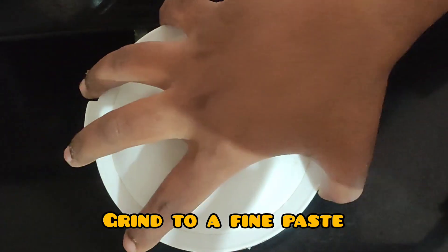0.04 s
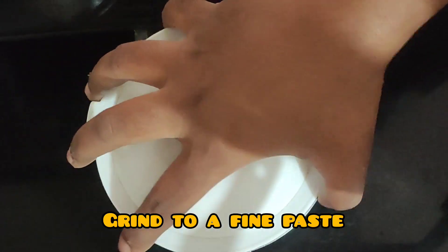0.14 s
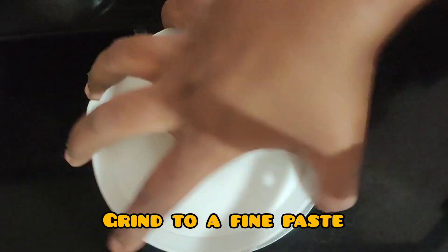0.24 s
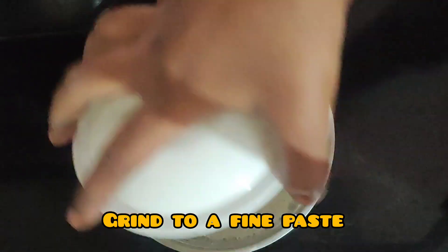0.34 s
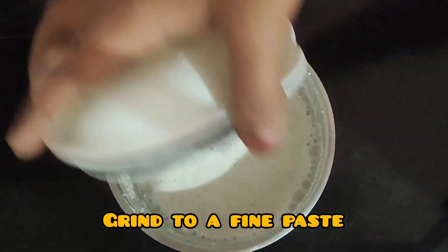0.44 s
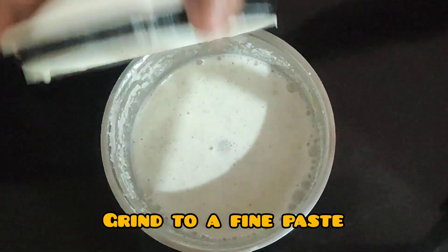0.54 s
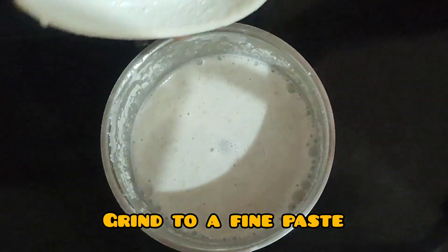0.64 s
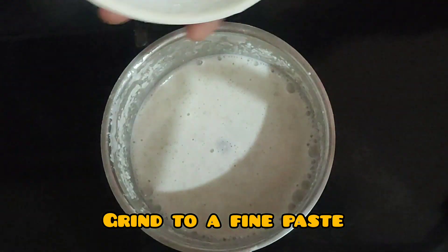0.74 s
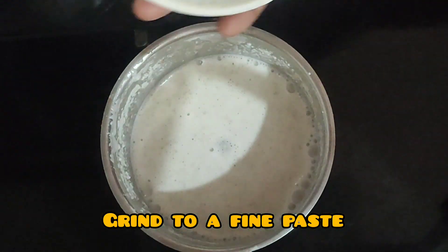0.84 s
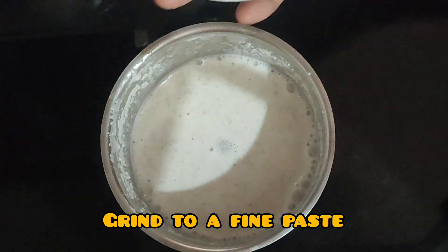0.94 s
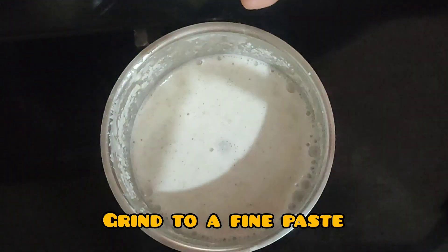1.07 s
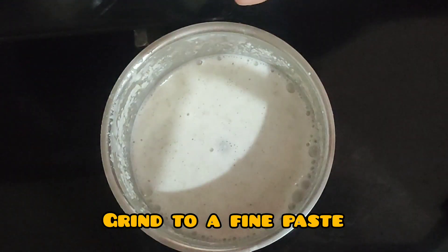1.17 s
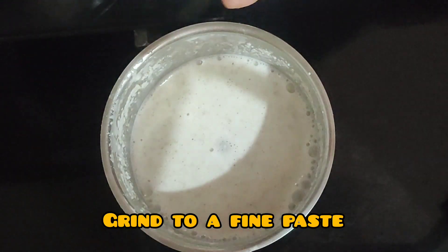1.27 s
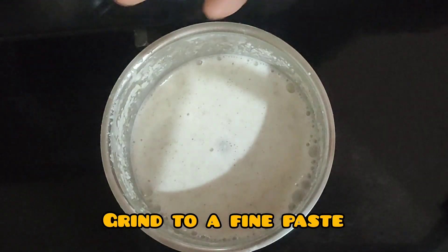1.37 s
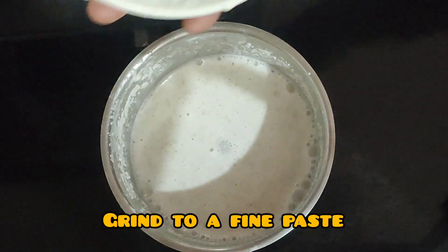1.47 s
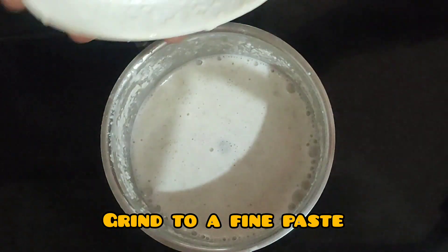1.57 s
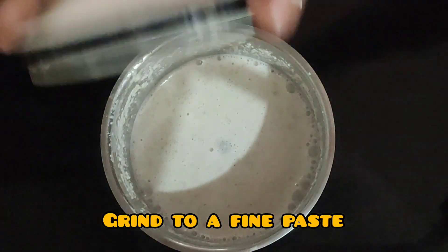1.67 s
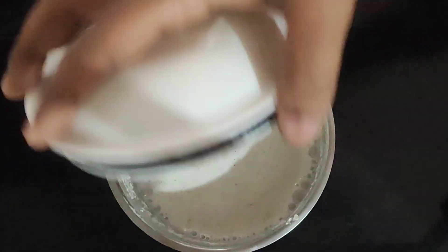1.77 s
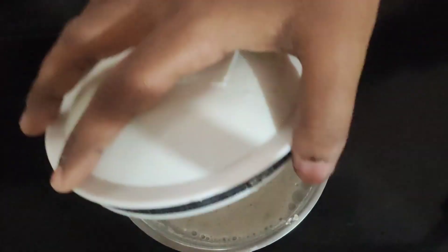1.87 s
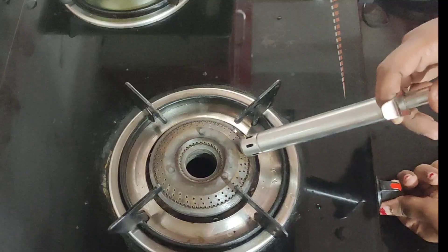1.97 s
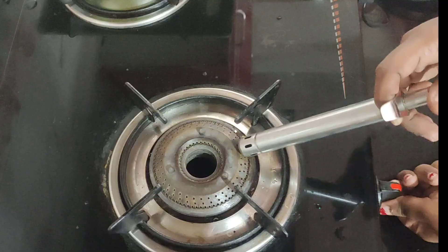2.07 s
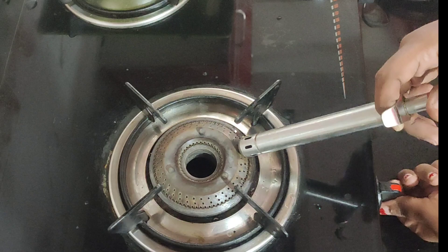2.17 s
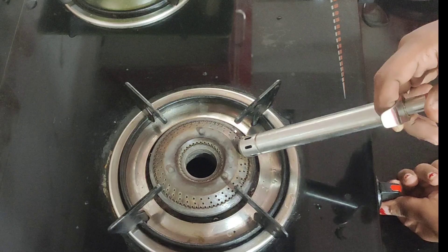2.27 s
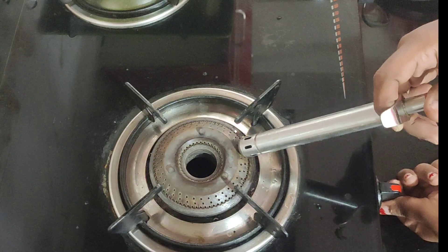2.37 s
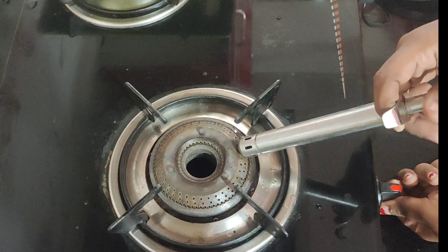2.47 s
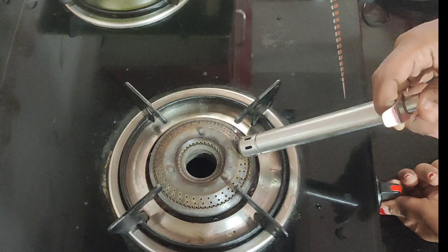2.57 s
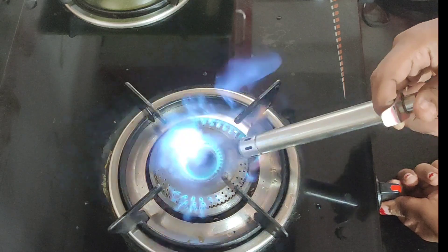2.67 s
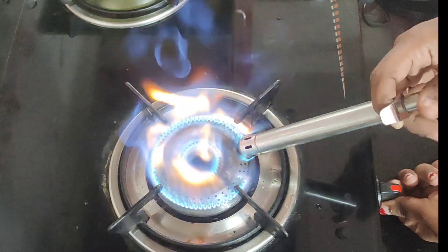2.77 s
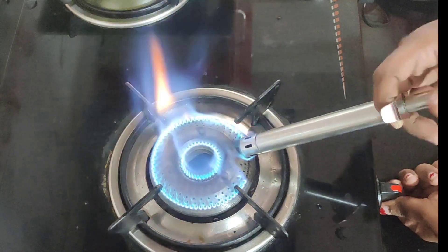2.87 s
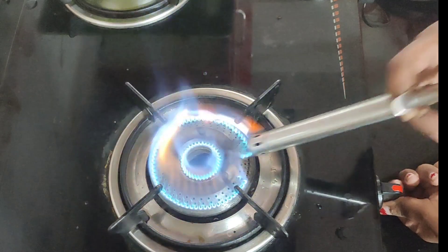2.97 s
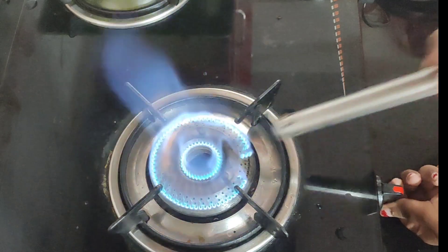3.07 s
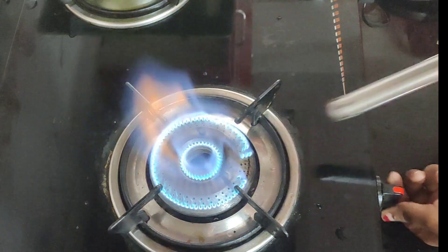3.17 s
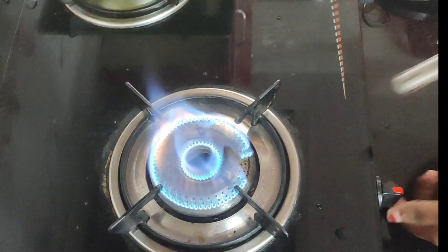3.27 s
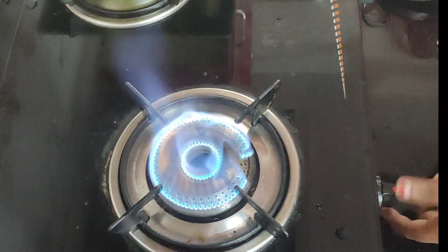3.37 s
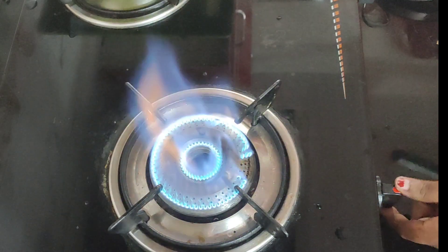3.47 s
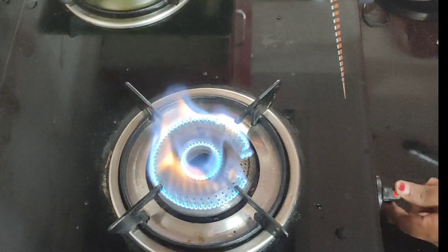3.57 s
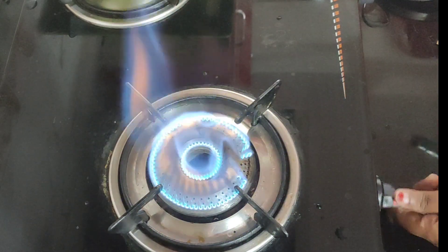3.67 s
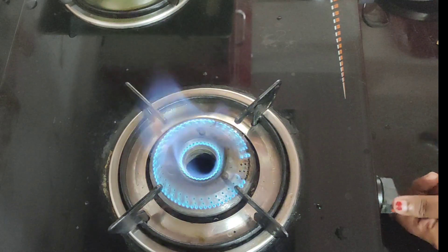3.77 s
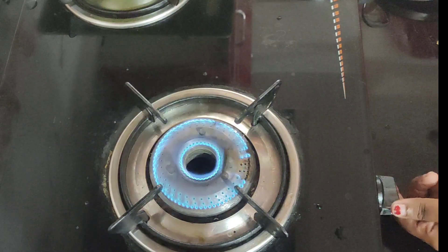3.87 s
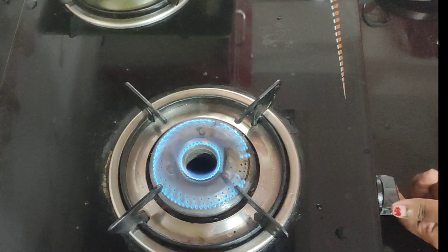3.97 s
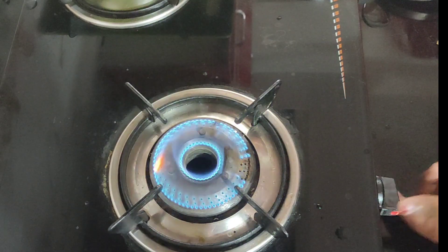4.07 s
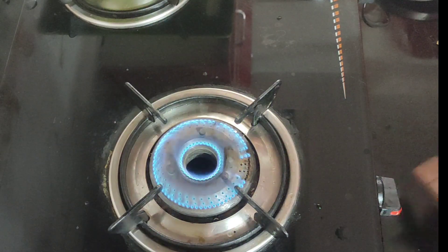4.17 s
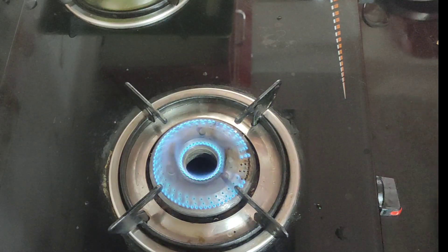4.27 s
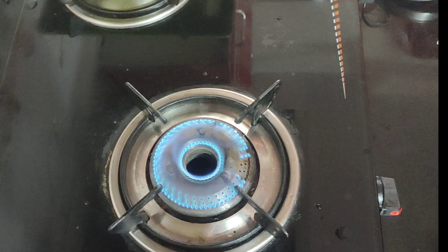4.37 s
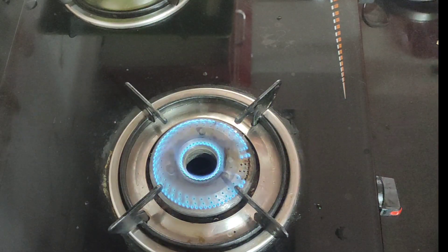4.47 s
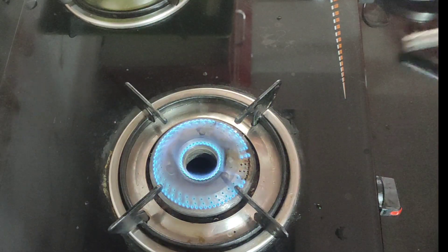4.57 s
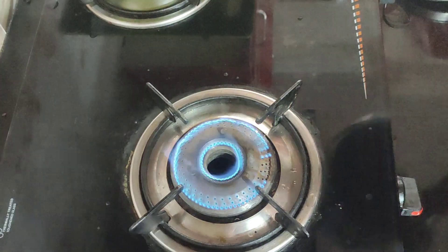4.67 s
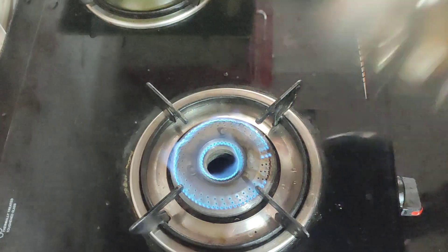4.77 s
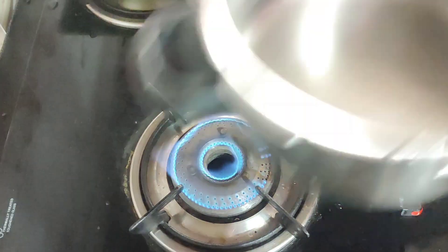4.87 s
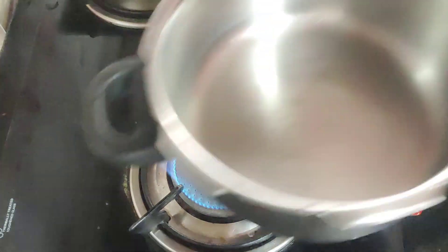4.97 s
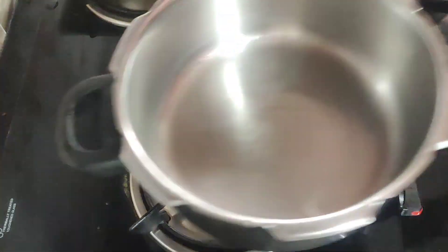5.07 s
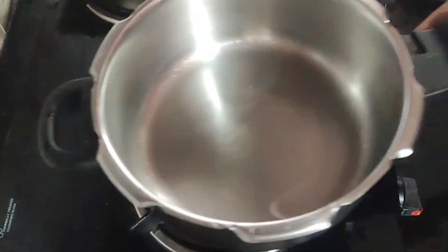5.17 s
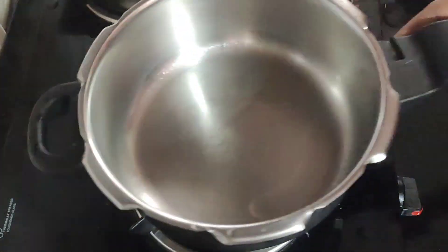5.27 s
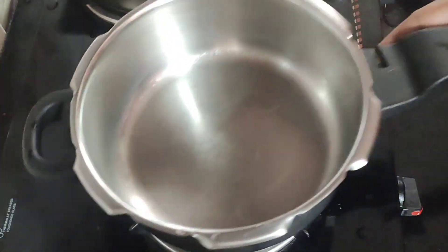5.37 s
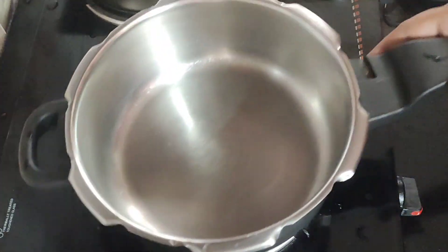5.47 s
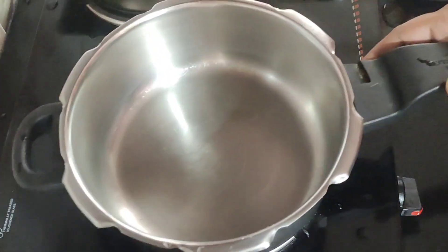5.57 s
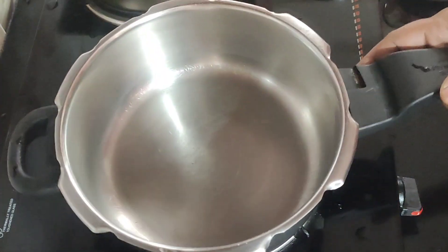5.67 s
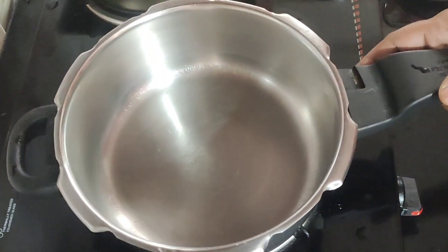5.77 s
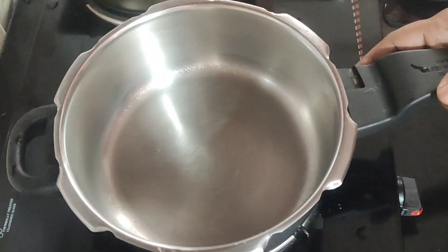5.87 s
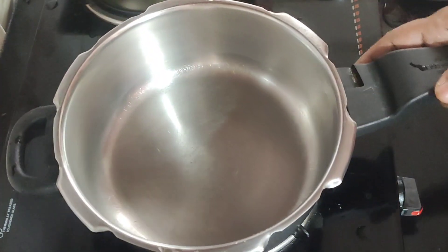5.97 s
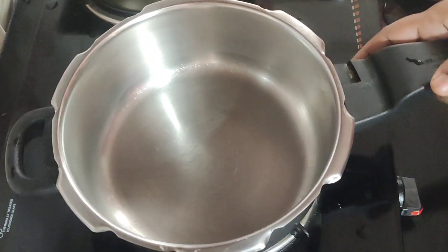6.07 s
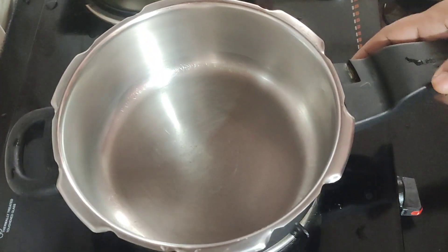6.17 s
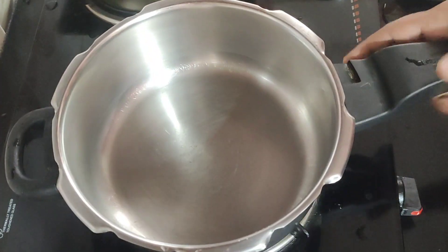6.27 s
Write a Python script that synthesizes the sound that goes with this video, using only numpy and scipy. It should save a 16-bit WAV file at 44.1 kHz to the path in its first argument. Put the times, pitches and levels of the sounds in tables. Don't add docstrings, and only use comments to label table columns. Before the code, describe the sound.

Low rumble and appliance drone underlie a home kitchen heard from nearby by a two-microphone phone. After barely audible bangle tinkles comes a compact panel knock, then a bright hard lighter snap and a short bassy ignition puff. Faint clicks from the lighter and knob follow, and two weak steam spurts. Last, a steel pot lands with a double clang, rattles on heavy iron and gives small settling knocks.

```python
import sys
import numpy as np
from scipy import signal
from scipy.fft import rfft, irfft, next_fast_len
from scipy.io import wavfile
from scipy.ndimage import uniform_filter1d, map_coordinates

SR = 44100
rng = np.random.default_rng(int(sys.argv[2]) if len(sys.argv) > 2 else 0)


def magnitude_from_level(level_db):
    exponent = np.asarray(level_db, float) / 20
    return 10 ** exponent


def persist_wave(psi):
    counts = np.round(np.clip(psi, -1, 1) * 32767).astype(np.int16)
    wavfile.write(sys.argv[1], SR, np.atleast_2d(counts).T)


N = 279076

# (frequency [Hz], left-right likeness)
LIKENESS = [(60, 0.81), (130, 0.9), (290, 0.68), (640, 0.29), (1410, -0.25), (3100, 0.079), (6820, -0.03),
            (15000, -0.074)]



def pot():
    # (time [s], level [dB], brightness [dB per octave], left-right [dB])
    contacts = [(5.5092, -18, 1.5, 0.5), (5.5155, -24, 4, -5), (5.5395, -19.5, 0.5, 1),
                (5.549, -35, -3, -6), (5.583, -47, 11, -6), (5.6738, -33.5, -3, 5), (5.6945, -33, 0, -5.5),
                (5.700, -38.5, 6, 6), (5.708, -30.5, -3, 4), (5.714, -39.5, -7, -11), (5.724, -46, -8, -8)]
    # (frequency [Hz], level [dB], t60 [s])
    steel = [(1815, -12, .15), (2300, -14, .2), (2440, -6, .15), (2535, 0, .14), (2620, -7, .2),
             (2657, 1, .13), (2720, -3, .12), (2860, -12, .12), (3740, -8, .13), (3960, -14, .12),
             (4082, -3, .25), (4123, -3, .25), (4230, -9, .15), (4745, -10, .22), (5592, -7, .22),
             (5618, -6, .2), (6048, 3, .11), (6085, -5, .12), (6690, -13, .15), (7120, -18, .14),
             (7280, -16, .14), (7430, -14, .14), (7625, -16, .1), (8187, -9, .17), (9200, -18, .15),
             (9780, -19, .15), (10050, -22, .13), (10320, -20, .13), (10750, -23, .12), (12300, -22, .12)]
    # (frequency [Hz], level [dB per Hz])
    clank = [(300, -36), (900, -8), (2000, -7.5), (2600, 2.5), (3250, -12.5), (4000, -4), (5250, -18.5),
             (6000, -15.5), (6450, -31), (7500, -7.5), (8800, -35), (10200, -17), (11300, -29),
             (12500, -35.5)]
    # (time [s], level [dB], brightness [dB per
    # octave], left-right [dB])
    seats = [
        (5.5095, -27, -0.5, 6),
        (5.539, -25.5, 0, 4),
        (5.583, -34.5, 5.5, 5),
        (5.6738, -32.5, 1, 0),
        (5.690, -36.5, -4.5, 5),
        (5.7075, -30.5, 0.5, -2),
             (5.8345, -35.5, 1, 1),
        (5.93, -48, 0, 0),
        (6.2405, -38.5, 1.5, 0),
    ]
    # (frequency [Hz], level [dB], t60 [s])
    iron = [(283, 1.5, 0.13), (346, -11.5, 0.21), (666, 3.5, 0.1), (714, -10, 0.069), (854, 11, 0.033),
            (980, -15, 0.029), (1238, -1.5, 0.071), (2674, 6.5, 0.018)]
    # (frequency [Hz], level [dB per Hz])
    thud = [(150, -29), (300, -6.5), (750, 7.5), (1300, -1.5), (2000, -16), (2700, 4), (4000, -36),
            (8000, -37.5)]
    clang = struck(contacts, steel, clank, crack_db=-3, crack_t60=0.05, room_db=-4, scatter_db=2.5, rough=0.047)
    knocks = struck(seats, iron, thud, crack_db=-1, crack_t60=0.03, room_db=-6, scatter_db=2)
    return clang + knocks


def lighter():
    # (time [s], level [dB], brightness [dB per octave], left-right [dB])
    spark = [
        (2.6657, -30, -2, -4),
        (2.6669, -4, 2.5, -4),
        (2.6684, -7.5, 0, -3),
    ]
    # (frequency [Hz], level [dB], t60 [s])
    tube = [(779, -2.5, 0.046), (1368, -9.5, 0.089), (1890, -10, 0.11), (4100, -9.5, 0.024),
            (5150, 8.5, 0.02), (5820, 8.5, 0.012), (6140, -5, 0.0052), (7260, 9, 0.011),
            (10550, 8.5, 0.0079), (12600, -12, 0.012)]
    # (frequency [Hz], level [dB per Hz])
    snap_colour = [(200, -10), (500, -5), (800, -3), (1400, -9), (2050, -2.5), (3000, -10), (5200, -10.5),
                   (6300, -7.5), (8500, -16), (10500, -11), (15000, -14.5), (16000, -37)]
    # (time [s], level [dB], brightness [dB per octave], left-right [dB])
    release = [
        (2.949, -45.5, 1.5, -2),
        (2.9595, -56, -2, -2),
    ]
    # (frequency [Hz], level [dB], t60 [s])
    plunger = [(3500, 0, .02), (4000, -2, .03), (7500, 0, .012), (10300, -4, .01)]
    # (time [s], level [dB], brightness [dB per octave], left-right [dB])
    taps = [
        (3.0482, -45.5, 0, 0),
        (3.057, -47.5, 0, 0),
    ]
    # (frequency [Hz], level [dB], t60 [s])
    tap_ring = [(1070, 0, .1), (1400, -1, .1), (1600, -3, .1), (1990, -1, .12), (2460, -4, .1),
                (2880, -5, .1), (2975, -4, .13)]
    # (frequency [Hz], level [dB per Hz])
    tap_colour = [(500, -16.5), (1000, -2), (3100, -1), (4000, -16.5), (9000, -25), (12000, -54)]
    snap = struck(spark, tube, snap_colour, crack_db=-2, crack_t60=0.0033, room_db=-2.5, scatter_db=1, carry=0.24)
    click = struck(release, plunger, snap_colour, crack_db=-2, crack_t60=0.012, room_db=2, scatter_db=1)
    tap = struck(taps, tap_ring, tap_colour, crack_db=2, crack_t60=0.06, room_db=-2, scatter_db=2)
    return snap + click + tap


def knob():
    # (time [s], level [dB], brightness [dB per octave], left-right [dB])
    knocks = [
        (1.9948, -31.5, 5.5, -9),
        (1.9975, -29.5, 2, -6),
        (2.005, -32.5, 2, 6.5),
    ]
    # (frequency [Hz], level [dB], t60 [s])
    panel = [(142, -22, 0.13), (190, -4, 0.092), (288, -1, 0.091), (513, -13, 0.17), (614, -9, 0.12),
             (740, 5, 0.049), (858, -0.5, 0.08), (936, -5, 0.088), (1180, -4.5, 0.081), (1295, -4, 0.07),
             (1820, -8, 0.26), (1780, -16, 0.2), (2010, -16, 0.11), (2010, -20, 0.077), (2810, -17, .08),
             (3130, -24, 0.11), (3280, -15, 0.054), (6920, -23, 0.11)]
    # (frequency [Hz], level [dB per Hz])
    panel_crack = [(71, -26), (120, 10.0), (422, -8), (904, -1.5), (1090, -6.0), (1830, -7.0), (2580, -15),
                   (3120, -12.5), (5320, -26), (6820, -31), (11400, -30.5), (14800, -59.5), (22000, -120),
                   (12200, -64.0)]
    # (time [s], level [dB], brightness [dB per octave], left-right [dB])
    detent = [
        (3.8945, -47, 0, 1),
        (3.902, -46, 0, 1),
        (3.934, -51, 0, 0),
    ]
    # (frequency [Hz], level [dB], t60 [s])
    detent_ring = [(1090, -6, .06), (1190, -8, .06), (1480, -4, .08), (1550, -2, .09), (1620, -4, .1),
                   (3000, -14, .04)]
    # (frequency [Hz], level [dB per Hz])
    detent_colour = [(600, -44.5), (1100, -7), (1550, -0.5), (2100, -17.5), (3200, -17.5), (6000, -50.5)]
    push = struck(knocks, panel, panel_crack, crack_db=0.5, crack_t60=0.02, room_db=-2.5, scatter_db=0)
    turned = struck(detent, detent_ring, detent_colour, crack_db=-7, crack_t60=0.04, room_db=-3, scatter_db=1.5)
    return push + turned


def flame():
    # (peak time [s], puff level [dB])
    pockets = [
        (2.675, -42),
        (2.705, -39),
        (2.729, -31),
        (2.753, -31),
        (2.801, -34.5),
        (2.842, -51.5),
        (2.893, -57),
    ]
    # (frequency [Hz], level [dB per Hz])
    puff_colour = [(15, -28.5), (45, 10.5), (75, -3.5), (110, 2), (180, -4), (280, -11), (500, -18),
                   (1500, -53)]
    ignite_s = 2.675
    noise = rush(puff_colour, patchy_db=5)
    noise = 0.75 * noise.mean(axis=0) + 0.25 * noise
    power = uniform_filter1d(noise.mean(axis=0) ** 2, size=900)
    even = noise / np.sqrt(np.abs(power) + 0.17)
    lumps = sum(swell(s, 0, db, rise_db=500, fall_db=550) for s, db in pockets)
    roar = swell(ignite_s, 0, -50.5, rise_db=2000, fall_db=30)
    puff = (lumps + roar) * (np.arange(N) > ignite_s * SR) * even
    puff -= magnitude_from_level(4) * lumps
    mode_hz, width_hz = 106, 9
    hum = filtered(puff, lambda f: 1j * f * width_hz / (mode_hz ** 2 - f * f + 1j * f * width_hz))
    return puff + magnitude_from_level(2) * hum


def bangles():
    # (time [s], level [dB], frequency [Hz], t60 [s])
    touches = [(.1, -68, 4900, 0.4), (.13, -67.5, 7700, 0.81), (.34, -64, 8100, 0.41),
               (.43, -55, 11600, 0.13), (.43, -60, 14400, .1), (.44, -68, 10200, 0.33),
               (.79, -66, 7420, 0.33), (.8, -68, 9500, 0.17), (1.3, -59, 10100, 0.11),
               (1.6, -68, 6500, 0.36), (6.065, -57.5, 6100, 0.1), (6.1, -63, 4870, 0.2),
               (6.15, -64.5, 8080, 0.28), (6.22, -66.5, 4660, 0.2)]
    out, t = np.zeros((2, N + SR)), np.arange(SR // 2) / SR
    for s, db, hz, t60 in touches:
        pair = hz * (1 + 0.006 * rng.standard_normal((2, 1, 1)))
        phase = rng.uniform(0, 2 * np.pi, (2, 2, 1))
        ring = np.sin(2 * np.pi * pair * t + phase).sum(axis=0)
        envelope = magnitude_from_level(db - 60 * t / t60) * (1 - np.exp(-t / 0.0055))
        out[:, round(s * SR):][:, :len(t)] += envelope * ring
    return out[:, :N]


def steam():
    # (valve open time [s], length [s], hiss level [dB])
    spurts = [
        (4.158, .225, -66),
        (5.012, 0.23, -58),
    ]
    # (frequency [Hz], level [dB per Hz])
    jet = [(1500, -40), (3000, -6), (6000, -6), (7300, -2), (8800, -6), (13500, -8), (15400, -13)]
    opening = sum(swell(s, hold_s, db, rise_db=450, fall_db=230) for s, hold_s, db in spurts)
    return opening * rush(jet, patchy_db=0.4)


def house():
    # (start time [s], rumble level [dB], drone level [dB], air level [dB])
    shots = [
        (0, -52, -55.5, -57.5),
        (1.934, -52, -57, -57),
        (4.644, -51.5, -57.5, -57),
    ]
    # (frequency [Hz], level [dB per Hz])
    rumble_colour = [(12, -28), (20, 5), (70, -10.5), (97, -6), (152, -16), (195, -16), (231, -30),
                     (260, -14.5), (340, -59.5), (570, -120)]
    # (frequency [Hz], level [dB per Hz])
    drone_colour = [(110, -50), (180, -14.5), (249, -11), (324, 0), (377, -6.5), (445, -3.5), (601, -7),
                    (719, -8.5), (767, -11.5), (1000, -16.5), (1300, -35.5), (2200, -120)]
    # (frequency [Hz], level [dB per Hz])
    air_colour = [(410, -36), (700, -3.5), (861, -7), (1250, -6), (1920, -10.5), (2130, -11), (5470, -23),
                  (6390, -21), (8950, -28.5), (13500, -31.5), (15400, -29.5)]
    rumble_db, drone_db, air_db = curves(shots)
    rumble = magnitude_from_level(rumble_db + 0.54 * wobble(4.02)) * rush(rumble_colour, patchy_db=1)
    drone = magnitude_from_level(drone_db + 0.37 * wobble(4.39)) * rush(drone_colour, patchy_db=1.05)
    air = magnitude_from_level(air_db + 0.7 * wobble(5.28)) * rush(air_colour, patchy_db=1.53)
    return rumble + drone + air


def struck(blows, modes, colour, crack_db, crack_t60, room_db, scatter_db, rough=0.057, carry=0.74):
    out, t = np.zeros((2, N + SR)), np.arange(SR * 3 // 10) / SR
    hz, level, t60 = np.transpose(modes)[:, :, None]
    reach = 1 / (1 + 900 / hz)
    for s, db, tilt_db, pan_db in blows:
        gain = magnitude_from_level(level + tilt_db * np.log2(hz / 2500) + scatter_db * rng.standard_normal(hz.shape))
        jolts = uniform_filter1d(rng.standard_normal((len(hz), len(t))), size=300, axis=1)
        chatter = rough * np.cumsum(jolts, axis=1)
        lag = reach * rng.uniform(0, 2 * np.pi, (2,) + hz.shape)
        tones = np.sin(2 * np.pi * hz * t + chatter + lag)
        ring = (gain * magnitude_from_level(-60 * t / t60) * tones).sum(axis=1)
        ring *= (1 - np.exp(-t / 0.0005)) / np.linalg.norm(gain)
        burst = magnitude_from_level(crack_db - 60 * t / crack_t60) * rng.standard_normal((2, len(t)))
        crack = causal(burst, colour, tilt_db)
        far = causal((t == 0)[None] * np.linalg.norm(crack[0]), colour, tilt_db)
        side = magnitude_from_level(np.clip(pan_db, -4, 4) * np.array([[0.5], [-0.5]]))
        blow = (ring + crack) * side + magnitude_from_level(room_db) * echo(carry * ring + far)
        out[:, round(s * SR):][:, :len(t)] += magnitude_from_level(db) * blow
    return out[:, :N]


def echo(x):
    # (frequency [Hz], t60 [s])
    decay = [(150, 0.58), (600, 0.5), (2500, 0.41), (8000, 0.41), (15000, 0.21)]
    hz, t, (a, b) = signal.stft(rng.standard_normal((2, SR * 3 // 10)), SR, nperseg=256)
    turn = spread(hz)[:, None]
    mid, side = a * np.cos(turn), b * np.sin(turn)
    z = np.array([mid + side, mid - side])
    tail = signal.istft(z * magnitude_from_level(-60 * t / along(decay, hz)[:, None]), SR, nperseg=256)[1]
    tail = np.pad(tail, ((0, 0), (int(0.0033 * SR), 0)))
    tail = tail / np.linalg.norm(tail[0])
    return signal.fftconvolve(x.mean(axis=0)[None], tail, axes=1)[:, :x.shape[1]]


def rush(spectrum, patchy_db):
    z = signal.stft(rng.standard_normal((2, N + 512)), nperseg=512)[2]
    field = uniform_filter1d(rng.standard_normal(z.shape[1:]), size=5, axis=0)
    field = uniform_filter1d(field, size=10, axis=1)
    pair = signal.istft(z * magnitude_from_level(patchy_db * unit(field)), nperseg=512)[1][:, :N]
    mid, side = filtered(pair, lambda hz: magnitude_from_level(along(spectrum, hz)) * [np.cos(spread(hz)), np.sin(spread(hz))])
    return unit(np.array([mid + side, mid - side]))


def spread(hz):
    return np.arccos(np.clip(along(LIKENESS, hz), -1, 1)) / 2


def swell(s, hold_s, db, rise_db, fall_db):
    t = np.arange(N) / SR - s
    return magnitude_from_level(db - rise_db * np.clip(-t, 0, None) - fall_db * np.clip(t - hold_s, 0, None))


def causal(x, points, tilt_db):
    hz = np.fft.rfftfreq(1024, 1 / SR)
    response = magnitude_from_level(along(points, hz) + tilt_db * np.log2((hz + 50) / 2500))
    cep = irfft(np.log(response + 1e-6))
    cep[1:512] *= 2
    cep[513:] = 0
    pulse = irfft(np.exp(rfft(cep)))
    return signal.fftconvolve(x, pulse[None] / np.linalg.norm(pulse), axes=1)[:, :x.shape[1]]


def filtered(x, response):
    n = x.shape[-1]
    m = next_fast_len(n + 8192)
    return irfft(rfft(x, m) * response(np.fft.rfftfreq(m, 1 / SR)), m)[..., :n]


def wobble(rate):
    knots = rng.standard_normal(int(N * rate / SR) + 4)
    return map_coordinates(knots, [np.arange(N) * rate / SR])


def curves(rows):
    s, *cols = np.transpose(rows)
    row = np.searchsorted(s[1:], np.arange(N) / SR)
    return [c[row] for c in cols]


def along(points, hz):
    f, v = np.transpose(points)
    return np.interp(np.log(hz + 1), np.log(f + 1), v)


def unit(x):
    return x / np.sqrt(np.mean(x ** 2) + 1e-20)


def scene():
    return pot() + lighter() + knob() + flame() + bangles() + steam() + house()


def roll_off(x):
    return signal.sosfilt(signal.butter(12, 16290, fs=SR, output="sos"), x)


def record(dry):
    # (time [s], half width [s])
    changes = [
        (1.934, 0.0027),
        (4.644, 0.005),
    ]
    t = np.arange(N) / SR
    fade = np.prod([np.clip(np.abs(t - s) / half - 0.3, 0.2, 1) for s, half in changes], axis=0)
    heard = filtered(dry * fade, lambda hz: hz ** 2 / (hz ** 2 + 30 ** 2) / (1 + (hz / 16000) ** 40))
    return roll_off(heard)


dry = scene()
out = record(dry)
persist_wave(out)
```